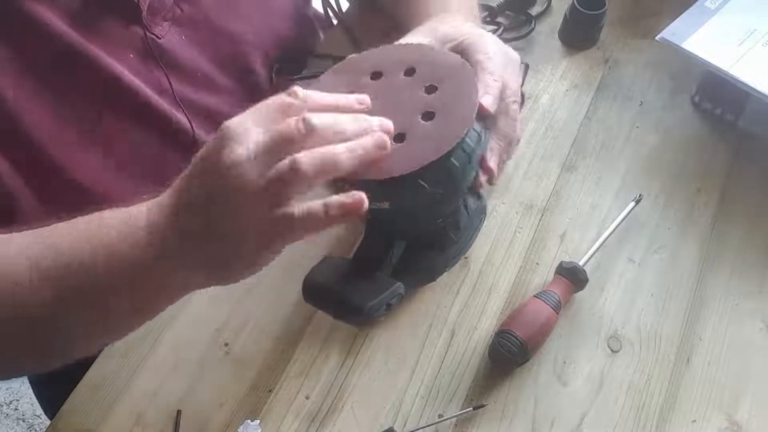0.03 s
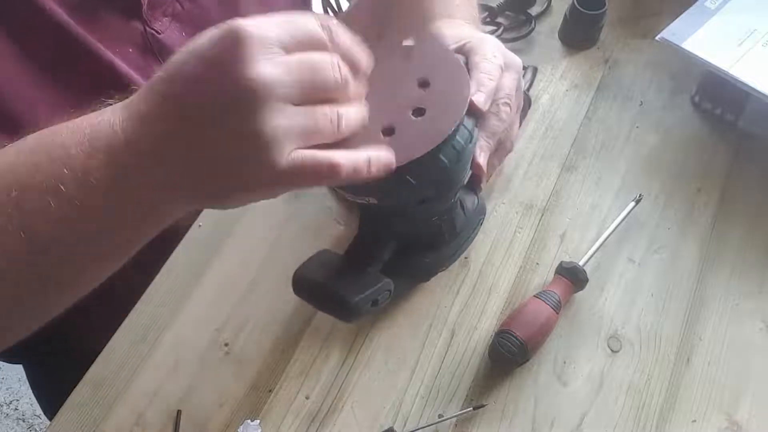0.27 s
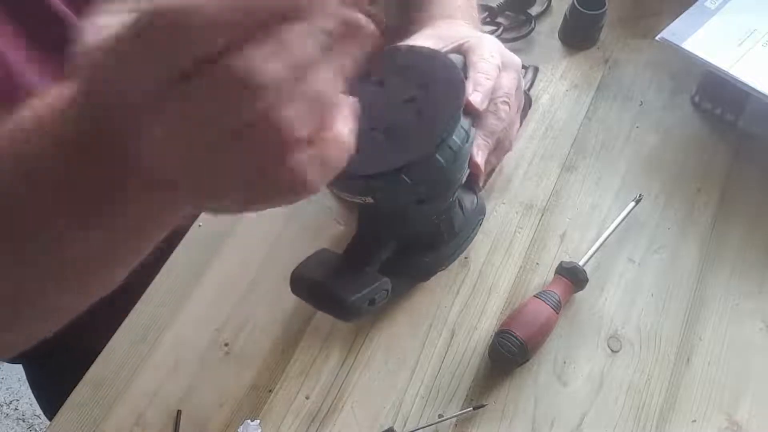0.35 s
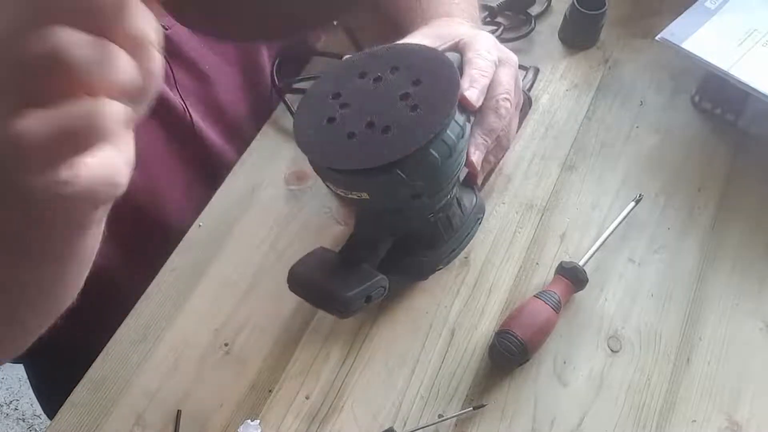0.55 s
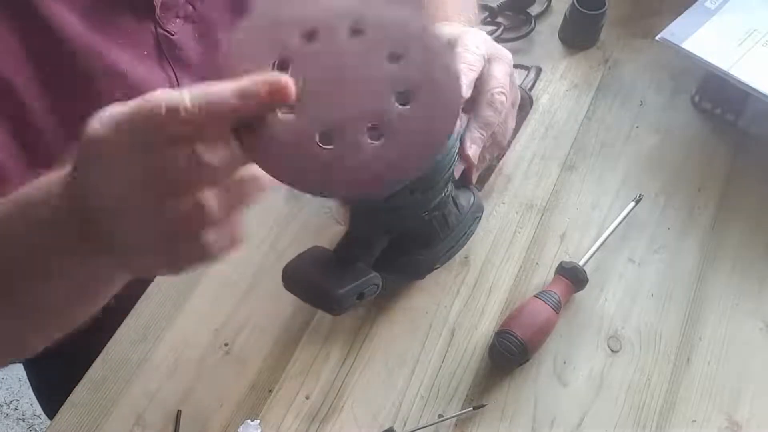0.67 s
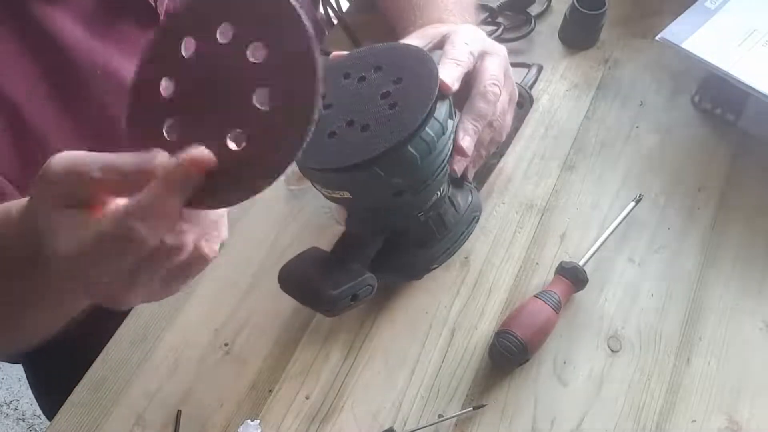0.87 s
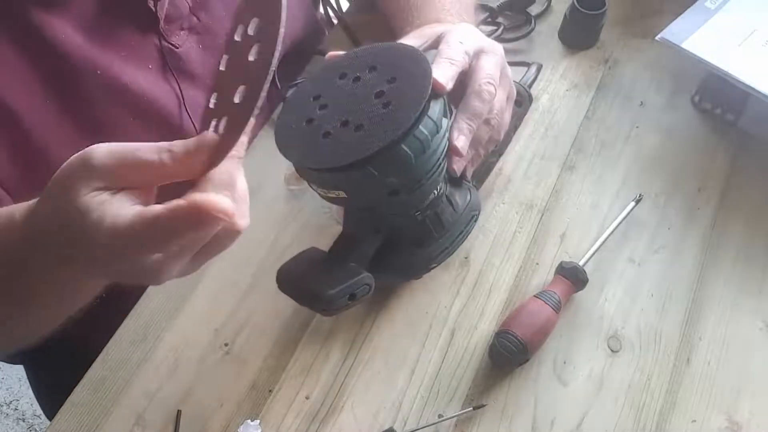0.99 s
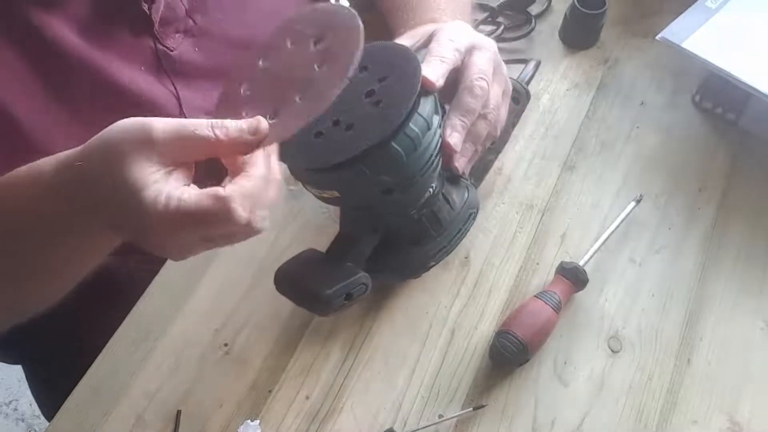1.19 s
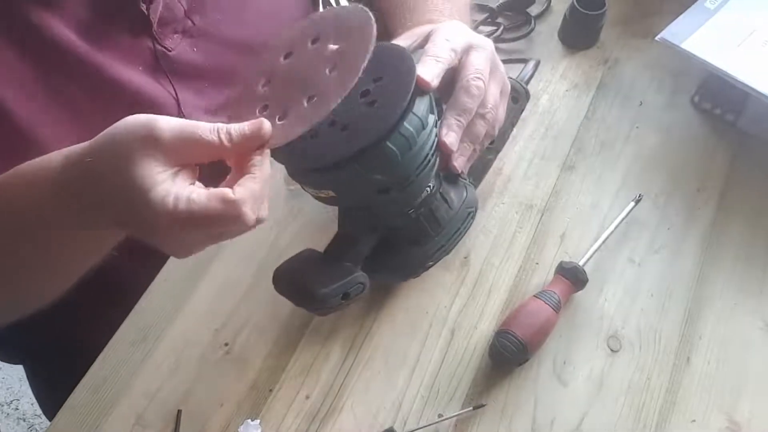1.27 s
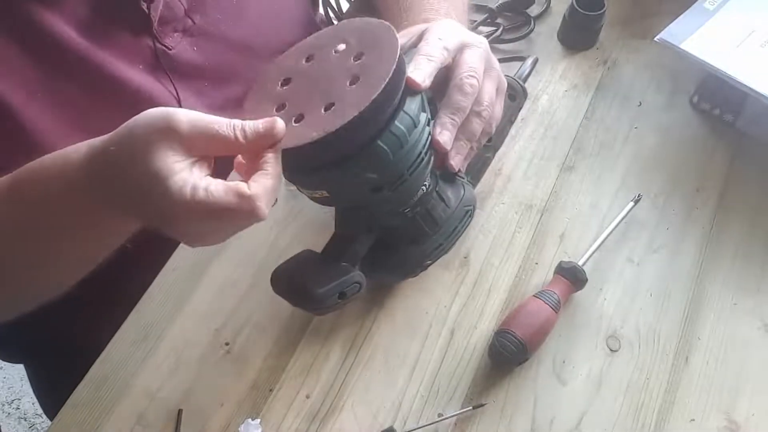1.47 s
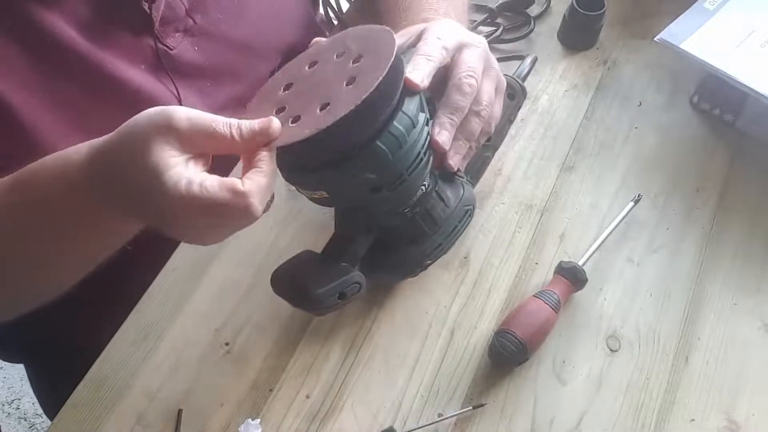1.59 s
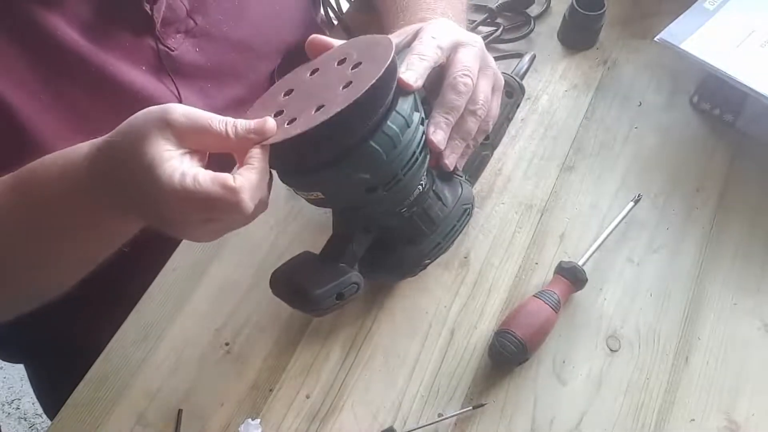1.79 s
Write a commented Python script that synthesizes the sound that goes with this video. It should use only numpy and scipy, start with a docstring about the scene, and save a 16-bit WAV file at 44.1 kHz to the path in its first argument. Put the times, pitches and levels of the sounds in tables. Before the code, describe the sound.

Sharp crackling tear of a sanding disc pulled from its pad, followed by quiet handling and a knock

```python
"""Sanding disc ripped off its pad

A hook-and-loop sanding disc is peeled, then ripped off a sander pad in a small quiet room. Hooks are short
ragged noise grains, in clusters that merge into one tear and excite the pad's modes. The paper disc rustles
between fingers as band-passed grit; hooks, paper and the knock tick as short noise bursts. The sander knocks
once on the wooden table, as dying sines with a chatter; handling adds dull puffs. Sparse echoes give the room
its tail; filtered noise gives its tone and a fading rumble."""
import sys
import numpy as np
from scipy import signal
from scipy.io import wavfile
from scipy.ndimage import uniform_filter1d

SR = 44100
rng = np.random.default_rng(int(sys.argv[2]) if len(sys.argv) > 2 else 0)


def transcribe(signal):
    """Save signal, clipped to [-1, 1], as a 16-bit WAV file at the path in sys.argv[1]."""
    frames = np.atleast_2d(signal).T
    limited = np.clip(frames, -1, 1)
    pcm = np.round(limited * 32767).astype(np.int16)
    wavfile.write(sys.argv[1], SR, pcm)


def boost(x):
    """Linear amplitude factor 10**(x/20) for a level x in decibels (scalar or array-like)."""
    u = np.asarray(x, float) / 20
    return 10 ** u


N = 81585  # samples

# Steady pull on the disc: t/s, tear level/dB, pad shake level/dB (both before colouring)
STEADY_PULL = [(.0, -61.5, -59), (.09, -59, -61.5), (.13, -52, -32), (.20, -37, -33), (0.23, -35, -34.5),
               (.255, -20.5, -19), (.285, -19, -16), (0.302, -16.5, -7), (.311, -36, -23.5)]
# Clusters of hooks letting go: t/s, peak level/dB (before colouring), length/s
HOOK_CLUSTERS = [(0.1188, -23, 0.0018), (0.134, -32, 0.0016), (0.136, -26, 0.0032), (0.1414, -17, 0.0049),
                 (0.147, -26, 0.0053), (.1620, -17, 0.012), (0.176, -24, 0.0073), (.1803, -21, .002),
                 (0.191, -21, .002), (0.1962, -18.5, 0.004), (0.198, -17.5, 0.0046), (0.2091, -19, .0012),
                 (0.2133, -13, 0.0038), (0.2238, -21, .003), (0.239, -17.5, 0.0036), (.2450, -16.5, 0.0011),
                 (0.2724, -7.5, 0.0011), (.2812, -7, 0.0016), (0.2975, -10, 0.0019), (0.305, -7, 0.0015)]
# Spectrum of the tearing hooks: f/Hz, relative level/dB
HOOK_SPECTRUM = [(1060, -41.5), (1800, -4), (2800, -11), (3400, -4), (4560, 1.5), (6900, -4), (8360, 3.5),
                 (10400, -1.5), (13000, -8.5), (16200, -29.5)]
# Modes of the pad: f/Hz, width/Hz, level/dB
PAD_MODES = [(100, 47, 2.5), (384, 180, 4.5), (637, 330, 1.5), (942.4, 240, -4), (1386.5, 160, 2.5),
             (1660, 260, -6)]
HOOKS_PER_S, CLUSTER_HOOKS_PER_S, HOOK_T60_S = 5000, 7100, 0.002
HOOK_SPREAD_DB, CLUSTER_SPREAD_DB = 3, 4
FIRST_HOOK_GAIN = 4  # the hook that starts a cluster, against the rest
CLUSTER_TO_PAD_DB = -1.5
SLIP_DB, SLIP_S = 2.5, 0.0015  # the peel line advances in uneven slips

# Fingers sliding on the paper: t/s, length/s, level/dB, low edge f/Hz, high edge f/Hz,
# lean (no unit, under 1 peaks early)
FINGER_STROKES = [(0.075, 0.043, -47, 2960, 11860, 0.46), (0.526, 0.08, -60.5, 5000, 13480, 0.26),
                  (0.564, 0.12, -64.5, 1975, 5500, 0.21), (0.65, 0.18, -65.5, 2800, 10880, 0.49),
                  (0.74, 0.037, -58, 895, 9000, 0.5), (0.758, 0.15, -72, 5140, 11500, 0.81),
                  (0.869, 0.076, -51.5, 4310, 10100, 0.7), (0.893, 0.053, -45, 593, 10850, 1.2),
                  (1.053, 0.17, -63, 3300, 10150, 0.25), (1.122, 0.33, -57, 2300, 10900, 0.19),
                  (1.255, 0.12, -63.5, 6340, 12500, 0.72)]
# Short ticks: two early hook snaps, then the stiff paper, and one at the knock: t/s, peak level/dB, centre f/Hz
SHORT_TICKS = [(0.016, -41, 5220), (0.0594, -43, 8250), (0.5143, -55, 1630), (0.5148, -50, 8600),
               (0.5301, -41, 11400), (.538, -42, 6600), (0.5682, -39, 6200), (0.7487, -38.5, 6360),
               (1.1245, -34, 6300), (1.7835, -59.5, 6860)]
# The stiff paper rings under the fingers: f/Hz
PAPER_MODES = [2800, 3899]
PAPER_WIDTH_HZ, PAPER_DB = 320, -3.5
GRIT_PER_S, GRIT_SPREAD_DB, GRIT_T60_S = 20000, 2.5, 0.0021
FLUTTER_DB, FLUTTER_S = 1, 0.008  # finger pressure wavers
TICK_WIDTH, TICK_T60_S = 0.6, 0.013  # nominal width as a share of the centre

# Table partials in the knock: f/Hz, relative level/dB, t60/s
TABLE_MODES = [(69, -5.5, 0.2), (455, 4.5, 0.038), (820, 5.5, 0.017), (1400, -4.5, 0.012), (623, 3, 0.011)]
# Dull puffs and thuds of disc, pad, paper and sander during handling:
# t/s, peak level/dB, centre f/Hz, t60/s
HANDLING_PUFFS = [(.025, -44.5, 378, 0.093), (.076, -42.5, 863, 0.16), (.140, -36.5, 375, 0.11),
                  (0.577, -51, 1650, .2), (0.662, -47.5, 200, 0.05), (0.692, -43, 230, 0.03),
                  (0.747, -41.5, 900, 0.039), (1.079, -51, 470, 0.05)]
PUFF_WIDTH_HZ = 300  # nominal
KNOCK_S, KNOCK_DB = 1.1256, -27.5
# a loose part chatters after the knock
RATTLE_HZ, RATTLE_WIDTH_HZ, RATTLE_DB = 1041, 600, -47
RATTLE_PER_S, RATTLE_T60_S, RATTLE_DEPTH = 37.9, 0.65, 0.4

# Spectrum of the room noise: f/Hz, relative level/dB
FLOOR_SPECTRUM = [(20, -28.5), (60, -7), (95, -18), (290, -24), (430, -18), (990, -21.5), (1800, -34),
                  (2700, -53), (4500, -56.5), (7500, -45), (16000, -66.5)]
FLOOR_DB = -60.5
# Fade of the low rumble: t/s, level/dB
RUMBLE_LEVEL = [(0, -49), (0.399, -64), (1.85, -70.5)]
RUMBLE_HZ, RUMBLE_WIDTH_HZ = 64.5, 45
# Decay of the room: f/Hz, t60/s
ROOM_DECAY = [(300, 0.16), (2000, 0.23), (10000, 0.16)]
ROOM_DB, ROOM_DELAY_S = -12, 0.0055


def rip():
    """Hooks snap singly and in clusters, each cluster with its own pitch; both shake the pad."""
    pull, clusters, t = np.array(STEADY_PULL), np.zeros(N), np.arange(1500) / SR
    steady = grains(HOOKS_PER_S, HOOK_SPREAD_DB, HOOK_T60_S)
    bunched = grains(CLUSTER_HOOKS_PER_S, CLUSTER_SPREAD_DB, HOOK_T60_S)
    pitches = rng.uniform(5200, 9000, len(HOOK_CLUSTERS))
    for (s, db, length), hz in zip(HOOK_CLUSTERS, pitches):
        first = FIRST_HOOK_GAIN * rng.standard_normal(len(t)) * boost(-60 * t / HOOK_T60_S)
        fade = boost(-20 * (t / max(length, 0.0005)) ** 2)
        cluster = (first + bunched[round(s * SR):][:len(t)]) * fade
        cluster = cluster + band(cluster, 0.61 * hz, hz)
        add(clusters, s, boost(db) * cluster / abs(cluster).max())
    steady = evened(steady * waver(SLIP_DB, SLIP_S))
    hooks = level(STEADY_PULL, pull[:, 1]) * steady + clusters
    shake = level(STEADY_PULL, pull[:, 2]) * steady + boost(CLUSTER_TO_PAD_DB) * clusters
    # a narrow then a broad resonance per mode
    pad = sum(boost(db) * ring(ring(shake, hz, width_hz), hz, hz) for hz, width_hz, db in PAD_MODES)
    return colour(hooks, HOOK_SPECTRUM) + pad


def paper():
    """Fine grit rustles under sliding fingers and rings the stiff paper."""
    out = np.zeros(N)
    grit = grains(GRIT_PER_S, GRIT_SPREAD_DB, GRIT_T60_S) * waver(FLUTTER_DB, FLUTTER_S)
    grit = grit + boost(PAPER_DB) * sum(ring(grit, hz, PAPER_WIDTH_HZ) for hz in PAPER_MODES)
    for s, length, db, low_hz, high_hz, lean in FINGER_STROKES:
        progress = np.linspace(0, 1, round(length * SR), endpoint=False)
        piece = np.roll(grit, rng.integers(N))[:len(progress)]
        rustle = evened(band(band(piece, low_hz, high_hz), low_hz, 1.15 * high_hz))
        swell = np.sin(np.pi * progress ** lean) ** 1.5
        add(out, s, boost(db) * swell * rustle)
    return out


def ticks():
    """Early hook snaps, the stiff paper and the knock tick as short noise bursts."""
    out = np.zeros(N)
    for s, db, hz in SHORT_TICKS:
        noise = rng.standard_normal(1024)
        add(out, s, boost(db) * burst(hz, TICK_WIDTH * hz, TICK_T60_S, noise))
    return out


def table():
    """One clear knock rings the table and sets off a chatter."""
    out, t = np.zeros(N), np.arange(SR // 2) / SR
    knock = np.zeros(len(t))
    for hz, db, t60 in TABLE_MODES:
        rise = np.minimum(t * hz / 0.5, 1)  # over half a cycle
        knock += rise * boost(db - 60 * t / t60) * np.sin(2 * np.pi * hz * t)
    add(out, KNOCK_S, -boost(KNOCK_DB) * knock)
    half = RATTLE_WIDTH_HZ / 2
    chatter = evened(band(rng.standard_normal(len(t)), RATTLE_HZ - half, RATTLE_HZ + half))
    pulse = 1 - RATTLE_DEPTH * np.cos(2 * np.pi * RATTLE_PER_S * t)
    add(out, KNOCK_S, boost(RATTLE_DB - 60 * t / RATTLE_T60_S) * pulse * chatter)
    return out


def handling():
    """Disc, pad, paper and sander puff and thud dully as dying bands of noise."""
    out = np.zeros(N)
    for s, db, hz, t60 in HANDLING_PUFFS:
        noise = rng.standard_normal(3000)
        add(out, s, boost(db) * burst(hz, PUFF_WIDTH_HZ, t60, noise))
    return out


def room(x):
    """Sparse echoes of random sign, each band dying at its own speed."""
    taps, at = np.zeros(SR // 2), np.arange(0, SR // 2 - 12, 12)
    taps[at + rng.integers(0, 12, len(at))] = rng.choice([-1., 1.], len(at))
    taps[:round(ROOM_DELAY_S * SR)] = 0
    hz, t, z = signal.stft(taps, SR, nperseg=256)
    decay = boost(-60 * t / read(ROOM_DECAY, hz)[:, None])
    tail = signal.istft(z * decay, SR, nperseg=256)[1]
    return signal.fftconvolve(x, tail / np.linalg.norm(tail))[:N]


def room_tone():
    """Steady filtered noise for the room, plus a low band of noise that fades as a rumble."""
    hiss, deep = rng.standard_normal((2, N + 4096))  # the extra samples let the filters settle
    half = RUMBLE_WIDTH_HZ / 2
    rumble = evened(band(deep, RUMBLE_HZ - half, RUMBLE_HZ + half)[-N:])
    floor = boost(FLOOR_DB) * colour(hiss, FLOOR_SPECTRUM)[-N:]
    return floor + level(RUMBLE_LEVEL, np.array(RUMBLE_LEVEL)[:, 1]) * rumble


def grains(per_s, spread_db, t60, count=40):
    """Random clicks of uneven size, each ringing as one of several short ragged bursts."""
    size = boost(spread_db * np.minimum(rng.exponential(1, N), 3))
    size = size * (rng.random(N) < per_s / SR)
    kind, t = rng.integers(0, count, N), np.arange(512) / SR
    shapes = rng.standard_normal((count, len(t))) * boost(-60 * t / t60)
    return evened(sum(signal.oaconvolve(size * (kind == k), shapes[k])[:N] for k in range(count)))


def burst(hz, width_hz, t60, noise):
    """A dying puff of noise in one band, peak 1."""
    low_hz = hz - width_hz / 2
    x = band(noise * boost(-60 * np.arange(len(noise)) / SR / t60), low_hz, hz + width_hz / 2)
    x = band(x, low_hz, hz + width_hz)  # steeper edges, the upper one softer
    return x / abs(x).max()


def ring(x, hz, width_hz):
    """One mode: a resonance of gain 1 at its centre."""
    return signal.lfilter(*signal.iirpeak(hz, hz / width_hz, SR), x)


def waver(db, s):
    """Random gain, db rms, that changes every s seconds or so."""
    return boost(db * evened(uniform_filter1d(rng.standard_normal(N), round(s * SR))))


def band(x, low_hz, high_hz):
    """Band-pass with gentle slopes."""
    edges = np.clip([low_hz, high_hz], 20, 16000)
    return signal.sosfilt(signal.butter(2, edges, "band", fs=SR, output="sos"), x)


def colour(x, spectrum):
    """Minimum-phase filter with the given spectrum, unit energy."""
    hz = abs(np.fft.fftfreq(8192, 1 / SR))
    log_gain = np.log(np.maximum(boost(read(spectrum, hz)), 1e-5))
    taps = np.fft.ifft(np.exp(np.conj(signal.hilbert(log_gain)))).real[:4096]
    return signal.oaconvolve(x, taps / np.linalg.norm(taps))[:len(x)]


def read(points, hz):
    """Reads a curve along a log frequency axis."""
    f, value = np.transpose(points)
    return np.interp(np.log(hz + 1), np.log(f + 1), value)


def level(rows, db):
    """Gain along a curve in time, silent outside it."""
    return boost(np.interp(np.arange(N) / SR, np.array(rows)[:, 0], db, -150, -150))


def evened(x):
    """Scales to rms 1."""
    return x / np.sqrt(np.mean(x ** 2) + 1e-20)


def add(mix, s, sound):
    """Lays a sound into the mix at s seconds, cut at the end."""
    part = mix[round(s * SR):][:len(sound)]
    part += sound[:len(part)]


def scene():
    """Disc, paper, ticks, table and handling with their room tail, over the room tone."""
    near = rip() + paper() + ticks() + table() + handling()
    return (near + boost(ROOM_DB) * room(near) + room_tone())[None]


def roll_off(x):
    """The treble ends steeply here."""
    return signal.sosfilt(signal.butter(12, 16420, fs=SR, output="sos"), x)


def record(dry):
    """Delivers the finished mix."""
    return roll_off(dry)


dry = scene()
out = record(dry)
transcribe(out)
```